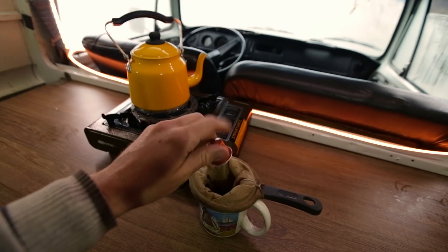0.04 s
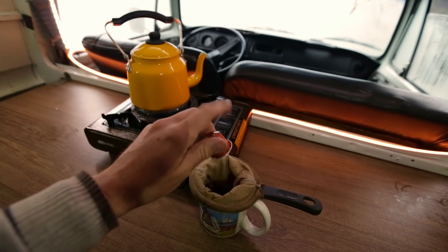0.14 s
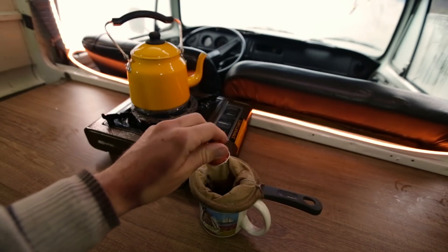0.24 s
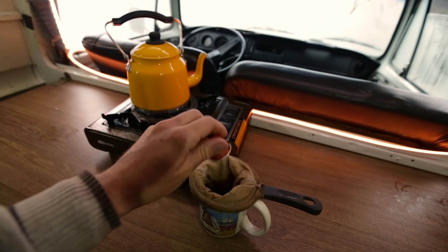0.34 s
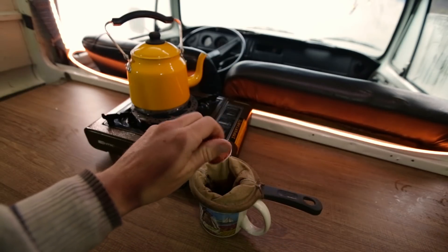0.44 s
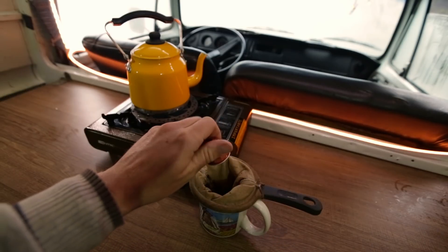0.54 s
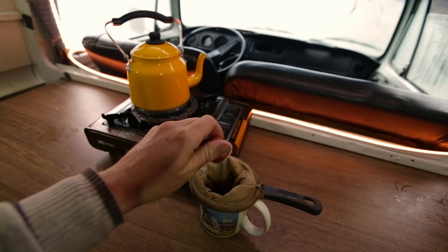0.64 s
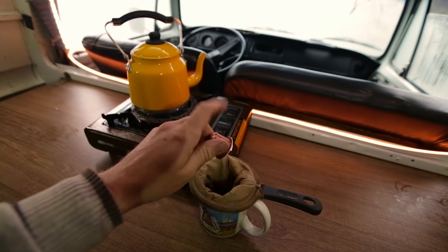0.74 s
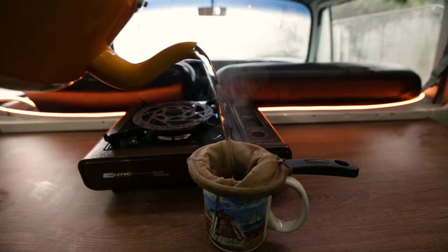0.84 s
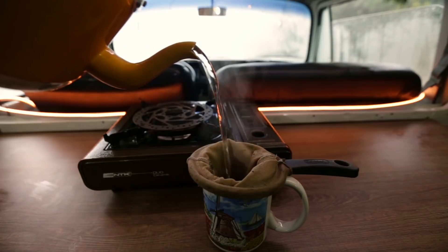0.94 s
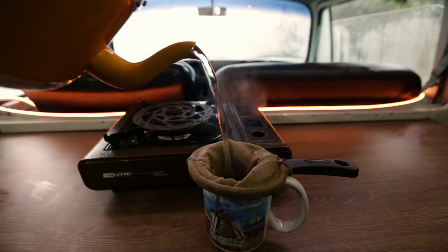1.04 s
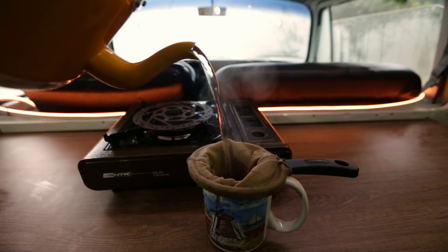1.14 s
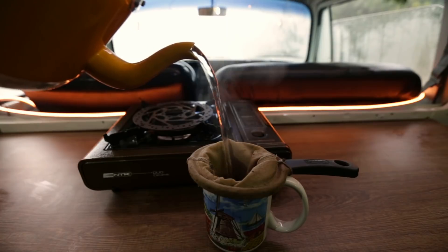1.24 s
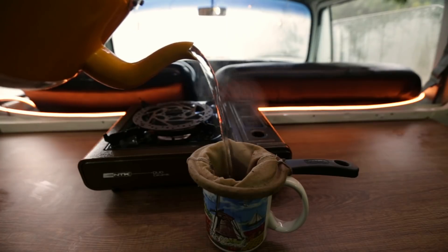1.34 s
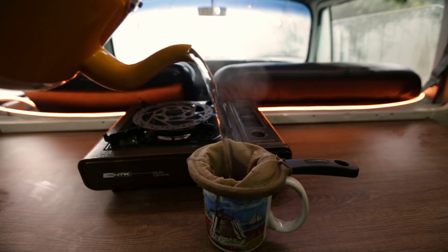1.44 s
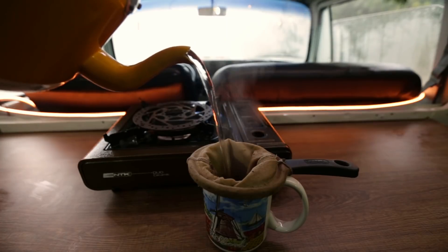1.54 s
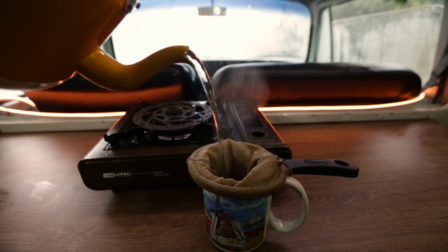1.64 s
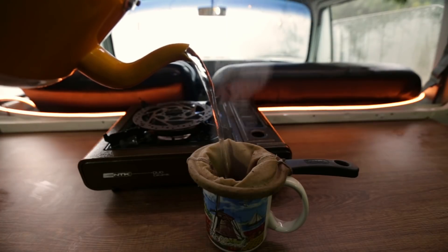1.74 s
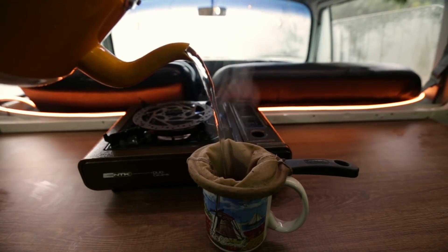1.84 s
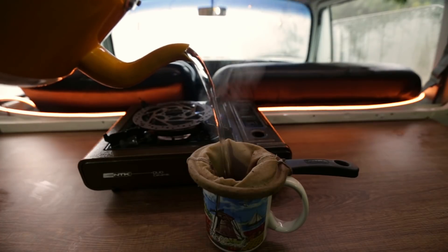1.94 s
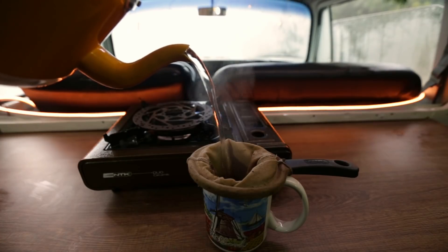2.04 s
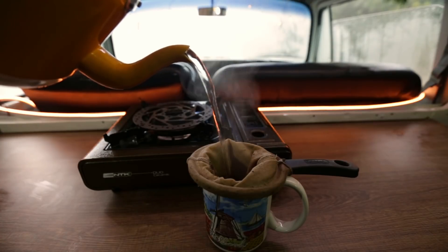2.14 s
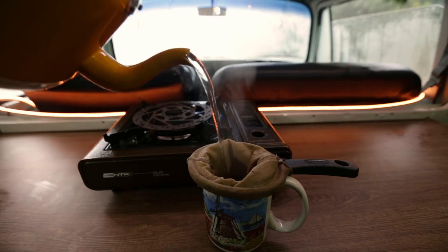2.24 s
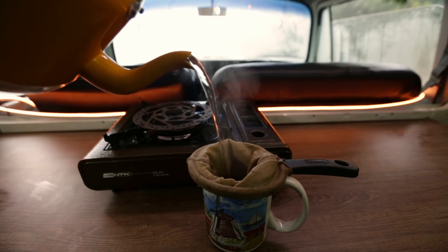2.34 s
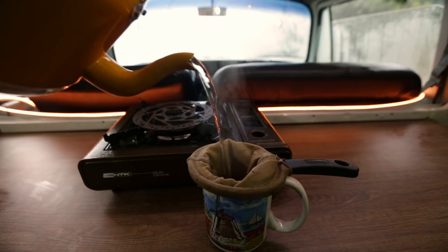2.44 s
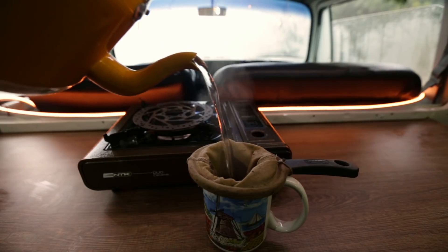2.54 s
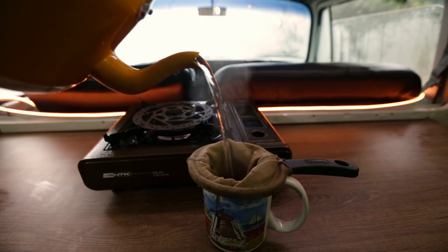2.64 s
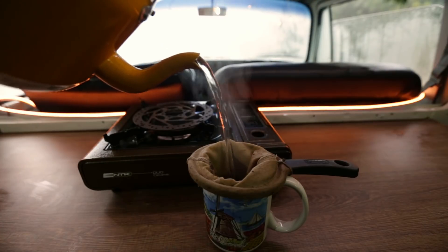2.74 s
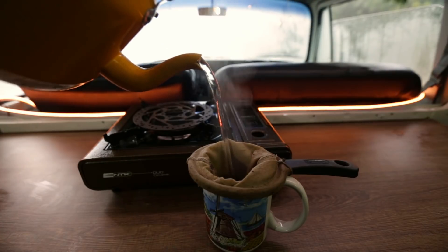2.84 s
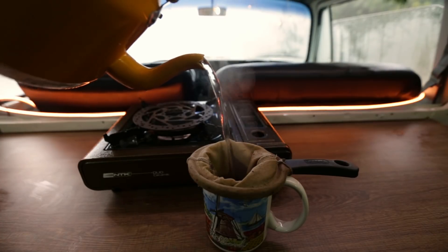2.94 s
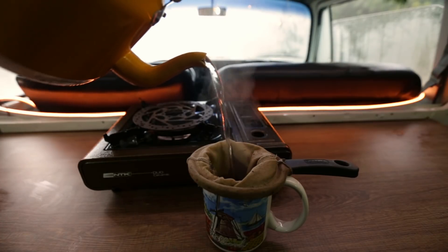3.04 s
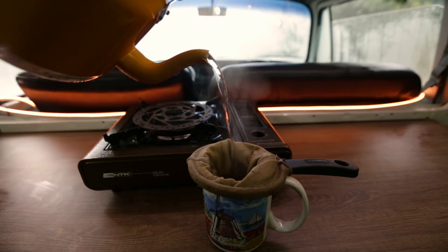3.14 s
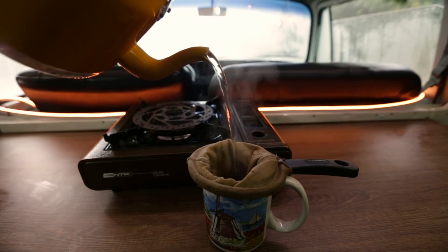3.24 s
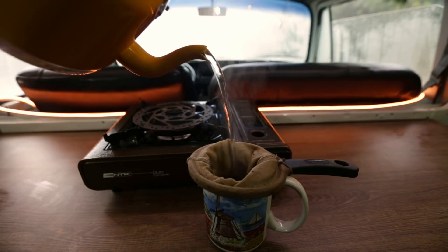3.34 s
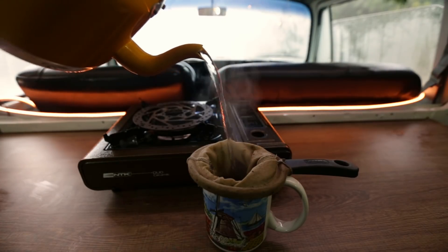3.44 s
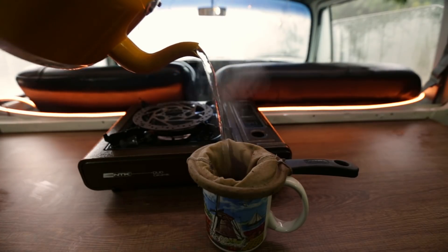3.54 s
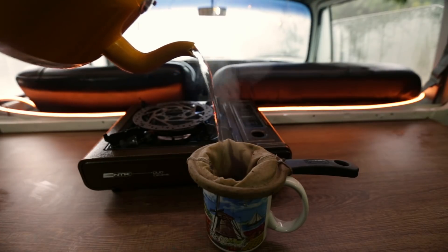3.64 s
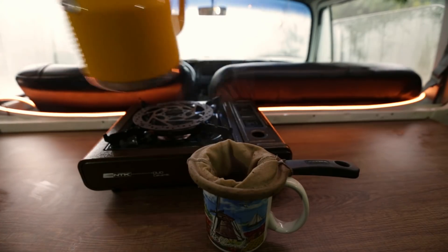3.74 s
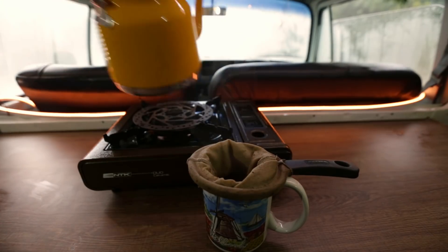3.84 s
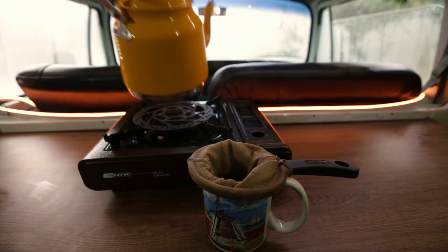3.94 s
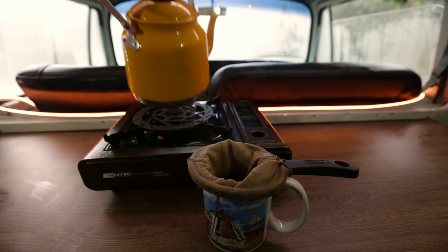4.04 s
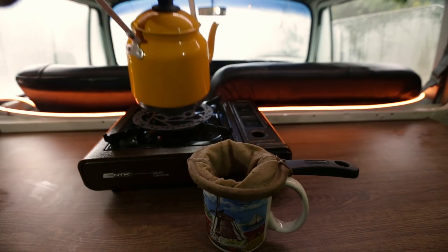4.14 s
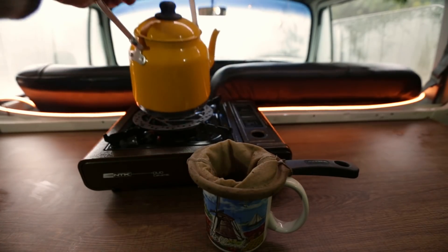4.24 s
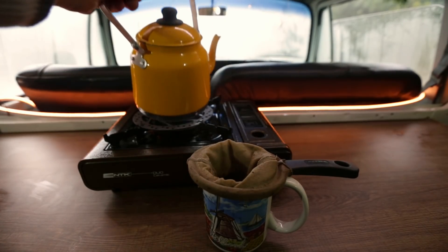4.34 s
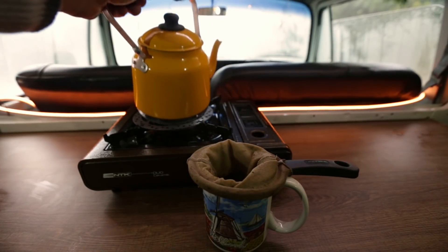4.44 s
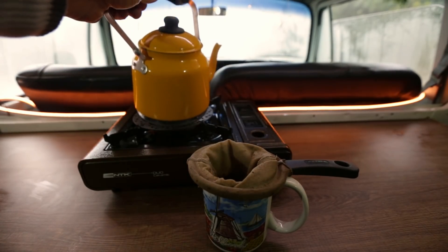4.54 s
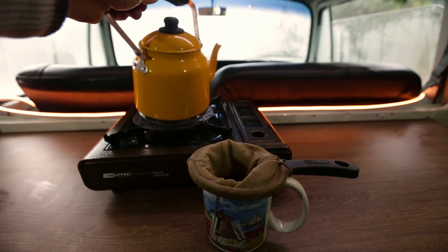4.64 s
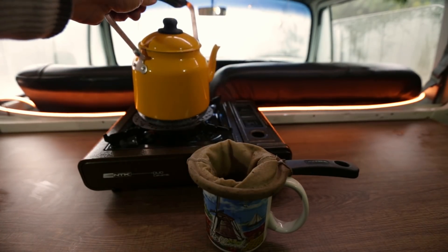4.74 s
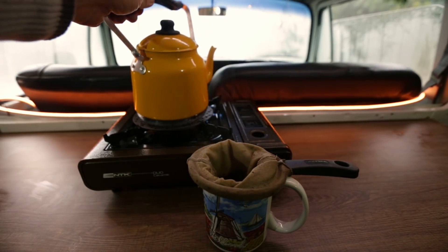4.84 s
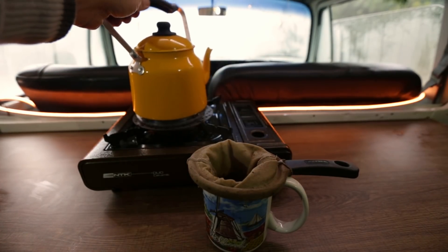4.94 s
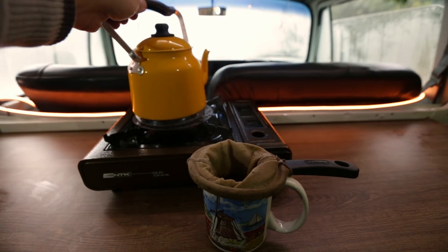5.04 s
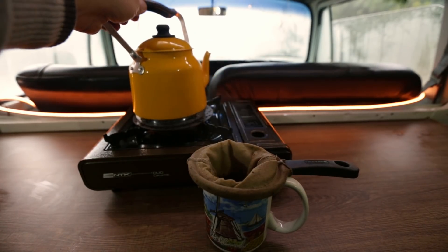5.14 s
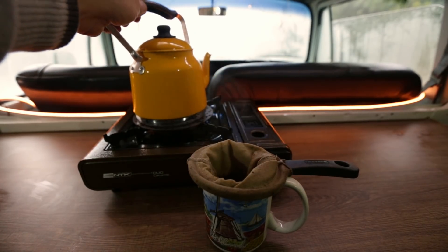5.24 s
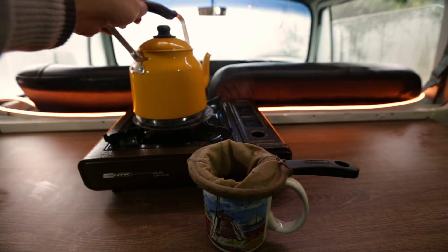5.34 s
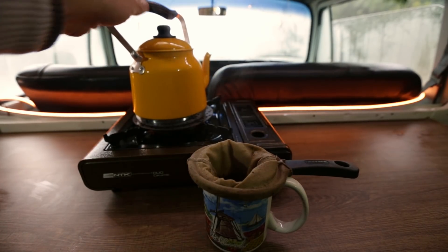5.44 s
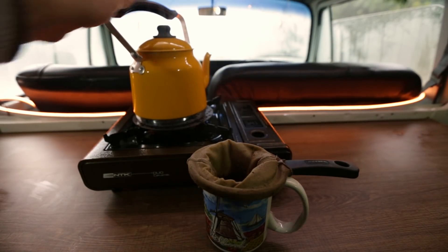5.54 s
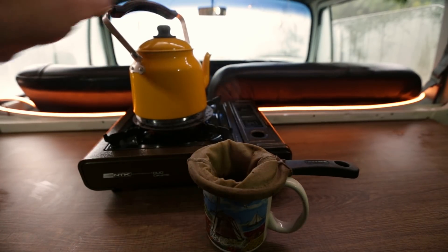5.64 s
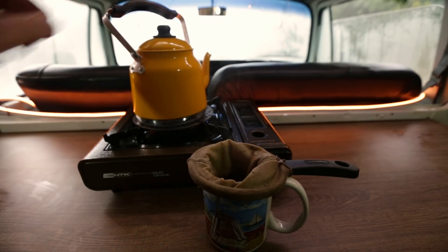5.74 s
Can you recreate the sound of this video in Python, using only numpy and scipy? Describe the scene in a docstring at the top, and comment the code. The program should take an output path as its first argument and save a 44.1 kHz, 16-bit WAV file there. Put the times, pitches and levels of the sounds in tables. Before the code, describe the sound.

Fizzing, prickling steam eases gradually while an uneven stream plops through wet cloth into a resonant mug. Bubbles pop and spray ticks around it. After the pour stops and a few drops fall, a hard, rattling metal clank lands on the stove, followed by small dull handle taps and near silence. Close microphone, short cabin reflections, sizzle faintly wide to both sides.

```python
"""Water poured from a kettle splats into a cloth coffee filter: trapped bubbles excite the modes of the mug.
The hot enamel kettle sizzles as random clicks of collapsing steam; its spout spits ringing bubbles and spray.
The last drops fall, then the kettle clanks on the stove grate: chatter excites its shell and the table.
Its handle ticks and knocks softly as filtered noise bursts, in the quiet air of a camper van."""
import sys
import numpy as np
from scipy import signal
from scipy.fft import rfft, irfft
from scipy.io import wavfile

SR = 44100
rng = np.random.default_rng(int(sys.argv[2]) if len(sys.argv) > 2 else 0)


def transcribe(u):
    """Save the signal u as a 16-bit wav file named by the first command-line argument.

    u: samples, shape (n,) or (channels, n), limited to [-1, 1]; the rate is SR.
    q: integer samples, one column per channel.
    """
    v = np.clip(np.atleast_2d(u).T, -1, 1)
    q = np.round(v * 32767).astype(np.int16)
    wavfile.write(sys.argv[1], SR, q)


N = 256062

# largest lumps of water landing in the filter, then the last drips: (t/s, level/dB)
LUMPS = [(0.467, -36), (0.521, -36.5), (0.591, -37.5), (0.88, -40.5), (0.913, -37), (1.014, -42),
         (1.043, -40.5), (1.062, -38.5), (1.173, -40), (1.326, -36.5), (1.363, -37), (1.425, -35.5),
         (1.543, -39), (1.583, -38.5), (1.661, -39.5), (1.746, -39.5), (1.877, -39.5), (1.941, -36),
         (2.087, -39.5), (2.135, -37.5), (2.162, -32), (2.37, -46), (2.406, -39), (2.495, -44.5),
         (2.575, -40.5), (2.636, -42.5), (2.659, -40), (2.844, -42), (3.024, -35.5), (3.075, -38.5),
         (3.094, -35.5), (3.181, -35.5), (3.331, -43.5), (3.396, -37.5), (3.421, -41), (3.691, -40),
         (3.797, -49), (3.814, -50.5), (3.969, -57), (4.02, -51.5), (4.104, -54), (4.124, -58.5),
         (4.308, -54), (4.447, -65.5)]
# the kettle's base chattering on the grate: (t/s, force/dB)
GRATE_CONTACTS = [(4.574, -3), (4.578, 5), (4.582, 5), (4.586, 5), (4.588, 4.5), (4.593, 4.5), (4.601, -30)]
# modes of the mug: (f/Hz, relative level/dB, t60/s)
MUG_MODES = [(520, -5.5, 0.12), (742, -44, 0.14), (859, 4.5, 0.12), (906, -1, 0.074), (944, -3, 0.12)]
# modes of the kettle's enamel shell: (f/Hz, relative level/dB, t60/s)
SHELL_MODES = [(301, -54, .9), (458, -44, .39), (772, -45, .41), (801, -37, .2), (855, -40, .23),
               (971, -40, .3), (1140, -43, .22), (1400, -45, .22), (1527, -38, .23), (2053, -42, .24),
               (2170, -42, .18), (2295, -43, .2), (2413, -40, .28), (2520, -39.5, .54), (2731, -38, .17),
               (2853, -49, .35), (3036, -35, .12), (3341, -40, .23), (3623, -47, .17), (3978, -52, .33),
               (4290, -52, .2), (4522, -51, .18), (5263, -62, .42), (6239, -44, .12), (7320, -60, .23)]
# spectrum of the low gulp of water: (f/Hz, relative level/dB)
GULP_SPECTRUM = [(50, -58), (114, -3.5), (150, -18), (195, -17.5), (250, 3), (335, 4.5), (440, -19),
                 (1200, -30.5), (5000, -93)]
# spectrum of the splash: (f/Hz, relative level/dB)
SPLASH_SPECTRUM = [(70, -49), (400, -3), (650, 5.5), (1150, 3), (1500, 1), (1850, -4.5), (2500, -3.5),
                   (4200, -3), (5200, -10.5), (15000, -24)]
# spectrum of fine spray: (f/Hz, relative level/dB)
SPRAY_SPECTRUM = [(2500, -18), (7000, 13.5), (15500, 10)]
# spectrum of the table's boom: (f/Hz, relative level/dB)
TABLE_SPECTRUM = [(20, -11), (70, -4.5), (170, -2.5), (300, -6), (900, -51)]


def amp(db):
    """Level to amplitude ratio: 20 dB is a factor of ten."""
    return 10 ** (np.asarray(db) / 20)


def evened(x):
    """Normalizes mean power: scales to rms 1."""
    return x / np.sqrt(np.mean(x ** 2) + 1e-20)


def sized(x):
    """Normalizes energy: scales a short sound to that of 20 ms at rms 1."""
    return x / np.sqrt(np.sum(x ** 2) / (.02 * SR) + 1e-20)


def read(points, hz):
    """Interpolates a spectrum linearly on a log-frequency axis."""
    f, value = np.transpose(points)
    return np.interp(np.log(hz + 1), np.log(f + 1), value)


def follow(rows, axis=1):
    """Envelope: gain over time, interpolated linearly in dB."""
    rows = np.array(rows)
    return amp(np.interp(np.arange(N) / SR, rows[:, 0], rows[:, axis]))


def add(mix, s, sound):
    """Superposition: adds a sound into the mix from time s."""
    part = mix[max(round(s * SR), 0):][:len(sound)]
    part += sound[:len(part)]


def through(x, response):
    """Linear filtering: convolves with an impulse response."""
    return signal.fftconvolve(x, response)[:len(x)]


def colour(points, size=4096):
    """Minimum phase: a causal impulse response whose phase follows from its log spectrum."""
    log_gain = np.log(amp(read(points, abs(np.fft.fftfreq(size, 1 / SR)))))
    log_response = np.conj(signal.hilbert(log_gain))
    return np.fft.ifft(np.exp(log_response)).real[:size // 2]


def ring(modes, size=6000):
    """Modal superposition: a sum of exponentially decaying sinusoids."""
    t = np.arange(size) / SR
    return sum(amp(db - 60 * t / t60) * np.sin(2 * np.pi * hz * t) for hz, db, t60 in modes)


def impact(scatter, fade_s, size=6000):
    """Impulsive excitation: one sharp push, then a decaying scatter of smaller ones."""
    spray = rng.standard_normal(size) * np.exp(-np.arange(size) / SR / fade_s)
    drive = scatter * spray / np.linalg.norm(spray)
    drive[0] -= 1
    return drive


def grains(per_s, spread_db):
    """Random point process: clicks of uneven size and random sign."""
    size = amp(spread_db * np.minimum(rng.exponential(1, N), 4))
    return size * rng.choice([-1, 1], N) * (rng.random(N) < per_s / SR)


def plop(hz, cycles, size=1500):
    """Bubble resonance: a trapped bubble oscillates for a few quickly decaying cycles."""
    turns = hz * np.arange(size) / SR
    return np.exp(-turns / cycles) * np.cos(2 * np.pi * turns)


def air():
    """Partial coherence: the van's quiet, alike in both ears at most pitches, under a faint wide hiss."""
    # (f/Hz, relative level/dB)
    spectrum = [(15, -43), (25, -0.5), (77, 1), (267, -3), (378, -8), (421, -7), (741, -9.5), (826, -24),
                (1340, -12), (2560, -6.5), (4500, -12), (15500, -16)]
    # left-right correlation: (f/Hz, coefficient/1)
    likeness = [(60, 0.71), (400, 0.64), (1400, 1), (2800, 0.99), (6800, 0.011)]
    hz = np.fft.rfftfreq(N, 1 / SR)
    shared, apart = rfft(rng.standard_normal((2, N))) * amp(read(spectrum, hz))
    same = np.clip(read(likeness, hz), 0, 1)
    side = apart * np.sqrt((1 - same) / (1 + same))
    return amp(-62) * evened(irfft([shared + side, shared - side], N))


def cabin(x, wet_db, t60):
    """Reverberation: short, bright reflections from the close walls and windows, thin in the bass."""
    t = np.arange(SR // 3) / SR
    taps = rng.standard_normal(len(t)) * (t > .004) * amp(-60 * t / t60)
    walls = colour([(200, -12.5), (3000, 4), (10000, 1)])
    tail = through(taps / np.linalg.norm(taps), walls)
    return x + amp(wet_db) * through(x, tail)


def lug():
    """Friction excites a resonance: the wire handle ticks in its lug, a faint, bright scrape on enamel."""
    # (t/s, level/dB, f/Hz)
    scrape = (5.097, -66, 5700)
    out, (s, db, hz) = np.zeros(N), scrape
    drive = impact(scatter=3, fade_s=.02)
    add(out, s, amp(db) * sized(through(drive, plop(hz, cycles=8))))
    return out


def handle():
    """Impact coupling: dull knocks of the settling handle faintly ring the shell and thump the table."""
    # (t/s, level/dB, decay time constant/s)
    knocks = [(5.114, -59.5, 0.13), (5.263, -45.5, 0.027), (5.416, -56, 0.033), (5.533, -54.5, 0.017),
              (5.68, -70, 0.049)]
    # (f/Hz, relative level/dB)
    knock_spectrum = [(35, -20), (60, -30), (477, -0.5), (553, -9), (1080, -8), (1320, -44), (1450, -22),
                      (1840, -29), (2520, -17), (5000, -35), (6500, -71), (11000, -120)]
    out, t = np.zeros(N), np.arange(SR // 2) / SR
    knock, thump = colour(knock_spectrum), colour(TABLE_SPECTRUM)
    shell = sized(ring(SHELL_MODES, size=len(t)))
    rise = t / 0.033  # the thump peaks after 33 ms
    for s, db, fade_s in knocks:
        tap, shake = rng.standard_normal((2, len(t)))
        add(out, s, amp(db) * evened(through(tap, knock)) * np.exp(-t / fade_s))
        add(out, s, amp(db - 3.0) * evened(through(shake, thump)) * rise * np.exp(-rise))
        add(out, s, amp(db - 29) * shell)
    return out


def swell(t, t60):
    """Incoherent addition: the energies of the grate contacts sum and decay; the peak is set to 1."""
    energy = sum((t >= s) * amp(db - 60 * np.maximum(t - s, 0) / t60) ** 2 for s, db in GRATE_CONTACTS)
    return np.sqrt(energy / energy.max())


def clank():
    """Repeated impact excites modes: the base chatters, the enamel shell rings and the table booms."""
    # (f/Hz, relative level/dB)
    chatter_spectrum = [(35, -58), (60, -30), (219, -28), (448, -5), (711, -11.5), (798, -0.5), (1050, -9),
                        (1560, -9), (1830, -12.5), (2980, -6.5), (3660, -15.5), (6380, -26.5), (15000, -58)]
    start = GRATE_CONTACTS[0][0]
    out, t = np.zeros(N), start + np.arange(SR) / SR
    crack, rattle, boom = rng.standard_normal((3, SR))
    drive = amp(-24.5) * crack * swell(t, t60=.028)
    drive += amp(-35) * rattle * swell(t, t60=.23)
    body = colour(chatter_spectrum)
    chatter = through(drive, body / np.linalg.norm(body))
    shell = 0
    for hz, db, t60 in SHELL_MODES:
        phase = rng.random()  # in cycles
        shell = shell + amp(db) * swell(t, t60) * np.sin(2 * np.pi * (hz * t + phase))
    table = evened(through(boom, colour(TABLE_SPECTRUM))) * swell(t, t60=0.6)
    add(out, start, chatter + amp(-0.5) * shell + amp(-51.5) * table)
    return out


def heat():
    """Exponential cooling: the sizzle's gain is steady, then sinks towards a faint simmer."""
    hot_db, hot_until_s, cooling_db, cooling_s = -45.5, 0.76, 26.5, 3.7
    cooled = 1 - np.exp(-np.maximum(np.arange(N) / SR - hot_until_s, 0) / cooling_s)
    return amp(hot_db - cooling_db * cooled)


def fizz():
    """Independent random grains per ear: droplets and steam prickle to either side, easing with the heat."""
    prickle = [evened(through(grains(per_s=350, spread_db=10), colour(SPRAY_SPECTRUM))) for ear in range(2)]
    return amp(-45.5) * np.sqrt(heat()) * np.array(prickle)


def sizzle():
    """Shot noise: countless steam bubbles collapse in the kettle, dying down as it cools."""
    # (f/Hz, relative level/dB)
    steam_spectrum = [(40, -34), (180, -10.5), (280, -6.5), (370, 6.5), (440, -0.5), (520, 6), (850, 5.5),
                      (1600, -1), (2000, -2), (2400, 1), (2900, -3), (4000, -14.5), (6000, -22.5),
                      (15000, -30.5)]
    return heat() * evened(through(grains(per_s=3000, spread_db=3.0), colour(steam_spectrum)))


def tick():
    """Impulsive excitation of a droplet: fine spray ticks on the rim, each with its own brightness."""
    centre_hz, log_spread = 7400, 0.62
    droplet = plop(centre_hz * np.exp(log_spread * rng.uniform(-1, 1)), cycles=0.6)
    drive = impact(scatter=0.75, fade_s=0.0032)
    return sized(through(through(drive, droplet), colour(SPRAY_SPECTRUM)))


def spits():
    """Bubble resonance: each bubble pops and fizzes around its own pitch, with a tick of fine spray."""
    # spits of steam and bursting bubbles; the last two rows are spray ticks among the final drips, with a faint
    # spit: (t/s, level/dB, f/Hz, spray level/dB)
    bursts = [(0.1562, -41, 2310, -64), (0.8147, -42, 2370, -57.5), (0.8783, -42, 2430, -76),
              (0.9582, -46.5, 2330, -80), (1.013, -46.5, 2240, -62.5), (1.127, -47.5, 2660, -56),
              (1.3237, -48, 2500, -58), (1.872, -54, 2720, -60), (2.3155, -60, 3920, -58.5),
              (2.402, -55, 2660, -56.5), (2.494, -48, 2920, -78), (2.5248, -50.5, 2500, -75),
              (2.7636, -49.5, 2550, -60), (3.117, -48.5, 3820, -80), (3.1755, -50.5, 4540, -56),
              (3.364, -47.5, 4130, -73), (3.421, -55, 4360, -57.5), (3.6235, -54, 4370, -61.5),
              (3.69, -56, 3700, -59), (3.807, -64, 6950, -64), (4.022, -64, 5450, -64)]
    # spectrum of a spit: (multiple of its pitch/1, relative level/dB)
    spit_spectrum = [(0.17, -47), (0.7, -8), (1.0, 0), (1.3, -8.5), (2.0, -27), (5.0, -42)]
    out = np.zeros(N)
    for s, db, hz, spray_db in bursts:
        bubble = colour([(hz * multiple, level) for multiple, level in spit_spectrum])
        burst = sized(through(impact(scatter=10, fade_s=.015), bubble))
        pop = sized(through(plop(hz, cycles=9.3, size=len(burst)), bubble))
        add(out, s, amp(db) * sized(burst + amp(-4.5) * pop))
        add(out, s, amp(spray_db) * tick())
    return out


def shares():
    """Energy partition: early the mug rings most; as it fills and the filter soaks, splashing takes over."""
    # (t/s, splash over ring level/dB)
    splashiness = [(0.0, -12), (0.9, -5), (1.5, -8), (2.15, -8), (2.55, -1), (3.05, -1.5), (3.45, 2),
                   (4.3, 6)]
    ratio = follow(splashiness)
    return np.array([np.ones(N), ratio]) / np.sqrt(1 + ratio ** 2)


def stream():
    """Source strength: gain of the stream over time; the filter has drained when the kettle lands."""
    # (t/s, level/dB)
    flow_curve = [(0.0, -51.5), (0.41, -53.5), (0.55, -44.5), (1.4, -44), (2.0, -50), (2.65, -45.5),
                  (3.5, -46), (3.75, -49), (3.95, -66.5), (4.5, -73)]
    return follow(flow_curve) * (np.arange(N) / SR < GRATE_CONTACTS[0][0])


def trickle(count=16):
    """Bubble resonance: small drops trap bubbles of many sizes and keep the mug gurgling."""
    drops = sum(through(grains(per_s=5, spread_db=1.8), plop(hz, cycles=1))
                for hz in np.geomspace(600, 1200, count))
    bubbles = sum(through(grains(per_s=12, spread_db=2.4), plop(hz, cycles=1.7))
                  for hz in np.geomspace(750, 4200, count))
    gurgle = amp(-6.5) * evened(through(grains(per_s=190, spread_db=3.5), colour(GULP_SPECTRUM)))
    hollow = amp(-4) * evened(through(drops, ring(MUG_MODES))) + gurgle
    splash = amp(-1.5) * evened(through(bubbles, colour(SPLASH_SPECTRUM)))
    ringing, splashing = shares()
    return stream() * (ringing * hollow + splashing * splash)


def small_lumps(count=120):
    """Jet breakup: the stream breaks into lesser lumps at a loose, steady pace: (s, gain)."""
    per_s, level_db, spread_db = 16, 0.5, 2.5  # levels relative to the stream
    times = (np.arange(count) + rng.random(count)) / per_s
    sizes = amp(level_db + spread_db * rng.standard_normal(count))
    flow, first, last = stream(), LUMPS[0][0], GRATE_CONTACTS[0][0]
    return [(s, size * flow[int(s * SR)]) for s, size in zip(times, sizes) if first < s < last]


def splats():
    """Impact and resonance: each lump plops into wet cloth, rings the air in the mug and throws spray."""
    bubble_hz, log_spread = 1223, 0.17  # the bubble that a splash traps; sizes vary at random
    mug_wander = 0.031  # the sagging cloth detunes the mug a little for every lump
    gulp_db, spray_db, spray_spread_db = -13, -28, 3  # gulp under the ring, spray under the whole splat
    out, share = np.zeros(N), shares()
    slap, gulp = colour(SPLASH_SPECTRUM), colour(GULP_SPECTRUM)
    for s, gain in [(s, amp(db)) for s, db in LUMPS] + small_lumps():
        ringing, splashing = gain * share[:, int(s * SR)]
        drive = impact(scatter=.6, fade_s=.008)
        low, high = np.exp(log_spread * rng.standard_normal(2))
        detune = 1 + mug_wander * rng.uniform(-1.01, 1)
        mug = through(ring([(hz * detune, db, t60) for hz, db, t60 in MUG_MODES]), slap)
        low_plop = through(drive, plop(880 * low, cycles=0.38))
        high_plop = through(drive, plop(bubble_hz * high, cycles=1.18))
        add(out, s, ringing * sized(through(low_plop, mug)))
        add(out, s, splashing * sized(through(high_plop, slap)))
        add(out, s, ringing * amp(gulp_db) * sized(through(drive, gulp)))
        add(out, s, gain * amp(spray_db + spray_spread_db * rng.standard_normal()) * tick())
    return out


def scene():
    """Superposition: water and steam reverberate in the cabin; the other sources add directly."""
    water = cabin(sizzle() + trickle() + splats() + spits(), wet_db=-9.0, t60=0.15)
    return water + fizz() + clank() + handle() + lug() + air()


def record(dry):
    """Band limiting: the recorder's linear-phase low-pass filter."""
    edge_hz = 15830
    lowpass = signal.firwin(801, edge_hz, window=("kaiser", 9), fs=SR)
    return signal.oaconvolve(dry, lowpass[None], "same", axes=1)


dry = scene()
out = record(dry)
transcribe(out)
```